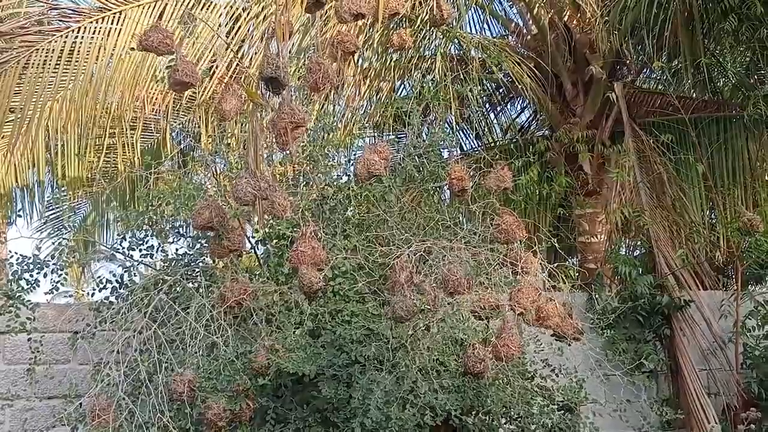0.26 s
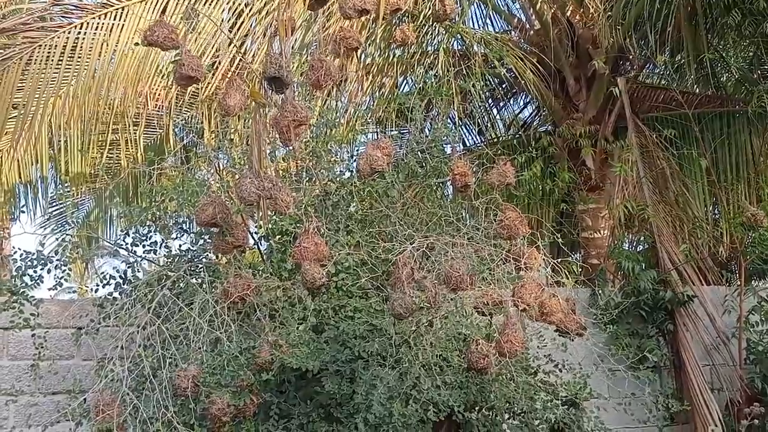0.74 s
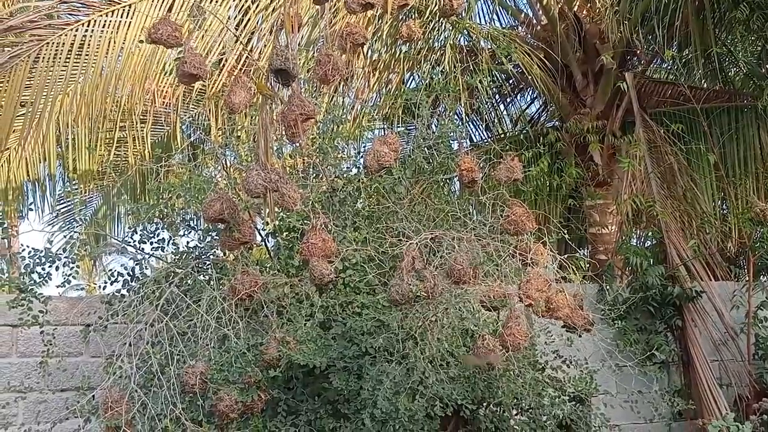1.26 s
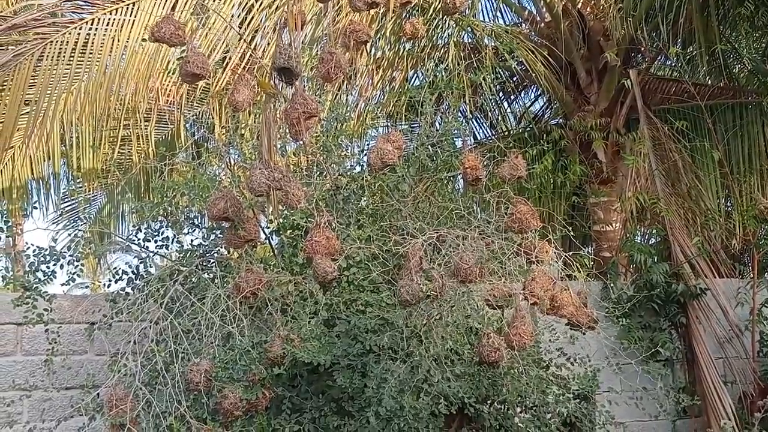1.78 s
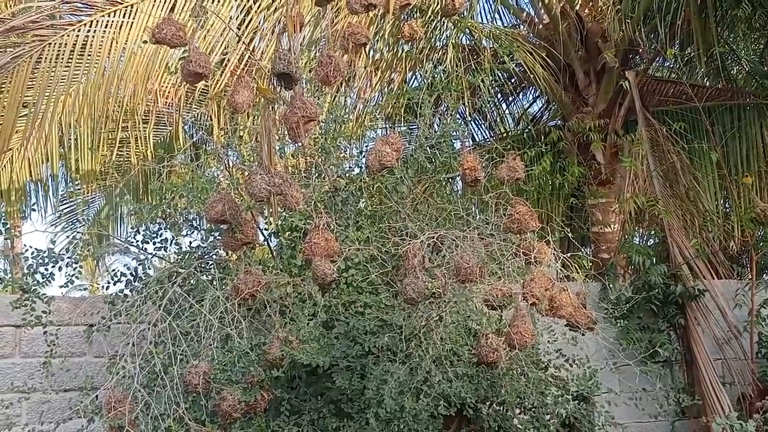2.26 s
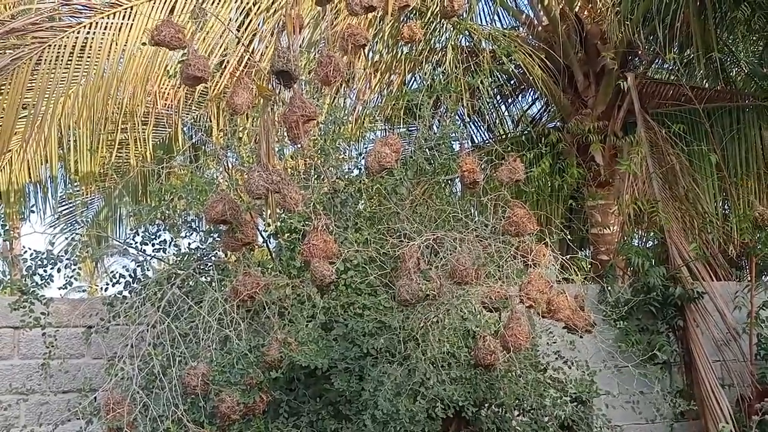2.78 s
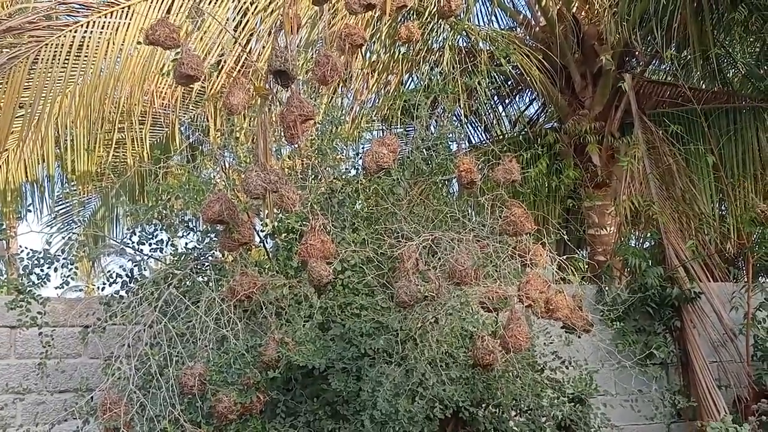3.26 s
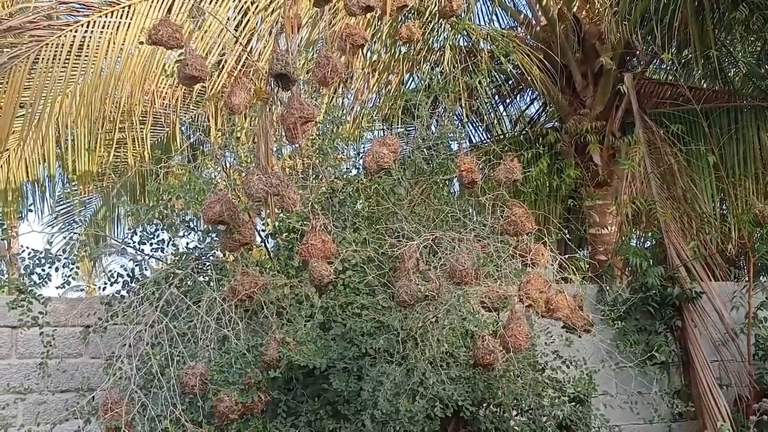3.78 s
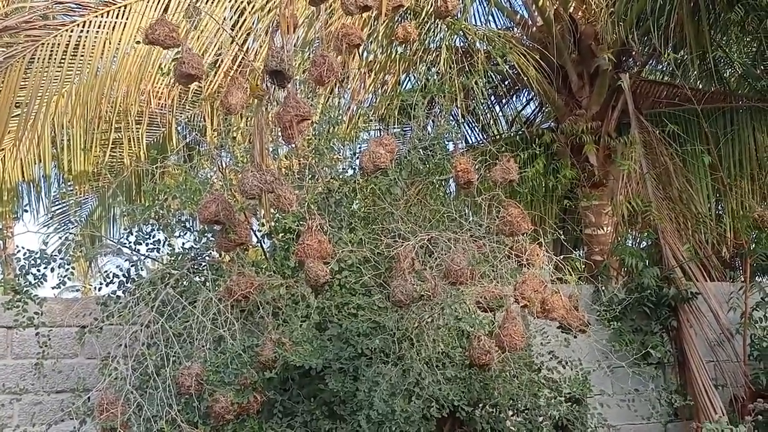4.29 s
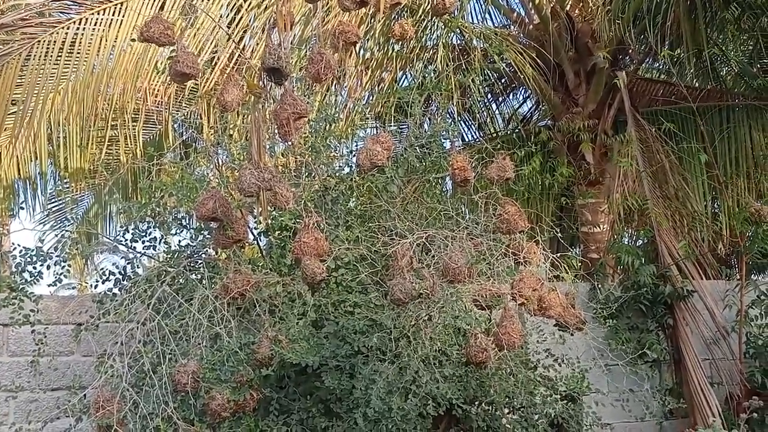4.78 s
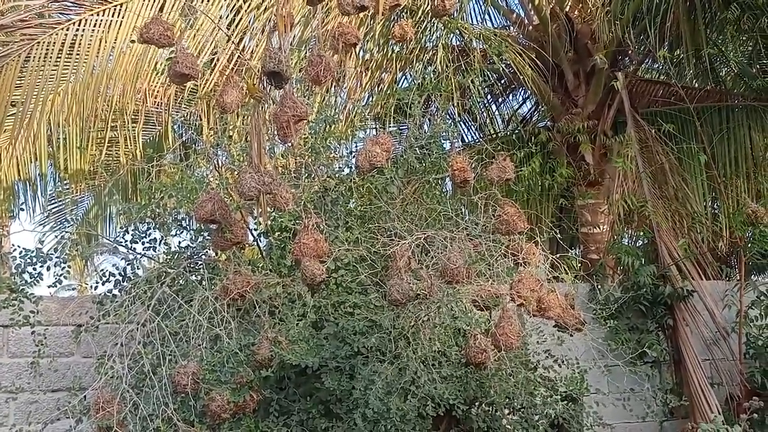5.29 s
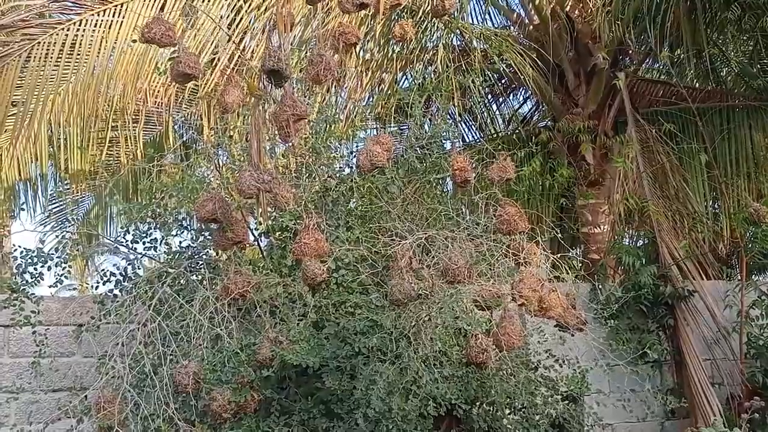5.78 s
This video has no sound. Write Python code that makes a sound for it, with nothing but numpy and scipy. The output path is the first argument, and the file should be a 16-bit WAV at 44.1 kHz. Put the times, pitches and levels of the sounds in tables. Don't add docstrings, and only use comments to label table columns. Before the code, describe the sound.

A weaver bird colony in a palm garden: soft buzzes and a dove's coo, a loud raspy chatter, dense chirping, then dry bill ticks and a sizzle.

```python
import sys
import numpy as np
from scipy import signal
from scipy.fft import rfft, irfft, next_fast_len
from scipy.io import wavfile
from scipy.ndimage import uniform_filter1d

SR = 44100
rng = np.random.default_rng(int(sys.argv[2]) if len(sys.argv) > 2 else 0)


def linear_from_db(decibels):
    return 10 ** (np.asarray(decibels, float) / 20)


def pcm_store(signal):
    levels = np.round(np.clip(np.atleast_2d(signal), -1, 1) * 32767)
    wavfile.write(sys.argv[1], SR, levels.astype(np.int16).T)


N = 266364


def unit(x):
    return x / np.sqrt(np.mean(x ** 2) + 1e-20)


def colour(x, points):
    size = next_fast_len(N + 4096)
    hz, level_db = np.transpose(points)
    bins_hz = np.arange(size // 2 + 1) * SR / size
    log_gain = np.interp(np.log(bins_hz + 1), np.log(hz), level_db) * np.log(10) / 20
    cepstrum = irfft(log_gain, size)
    cepstrum[1:size // 2] *= 2
    cepstrum[size // 2 + 1:] = 0
    return irfft(rfft(x, size) * np.exp(rfft(cepstrum)), size)[:N]


def wobble(size, hz):
    sos = signal.butter(2, hz, fs=SR, output="sos")
    return unit(signal.sosfilt(sos, rng.standard_normal(size + 2000))[2000:])


def shaken(phase, rough, real_hz, imag_hz):
    size = len(phase)
    shake = rough * (wobble(size, real_hz) + 1j * wobble(size, imag_hz))
    return np.real((1 + shake) * np.exp(1j * phase))


def grit(per_s, spread_db):
    sizes = linear_from_db(spread_db * np.minimum(rng.exponential(1, N), 4)) * rng.choice([-1, 1], N)
    sparse = sizes * (rng.random(N) < per_s / SR)
    return unit(unit(sparse) + 0.85 * rng.standard_normal(N))


def unroll(rows):
    s, pitch, *levels = np.transpose(rows)
    t = np.arange(round(s[0] * SR), min(N, round(s[-1] * SR))) / SR
    ends = np.clip(np.minimum(t - s[0], s[-1] - t) / 0.0013, 0, 1)
    phase = 2 * np.pi * np.cumsum(np.interp(t, s, pitch)) / SR
    gains = [linear_from_db(np.interp(t, s, column)) for column in levels]
    return round(s[0] * SR), np.sqrt(2) * ends, phase, gains


def add(out, start, x):
    out[start:start + len(x)] += x[:N - start]


def effort(start, length, level_db, shape):
    attack, rise_db, held, fall_db = shape
    top = min(attack, 0.5 * length)
    release = max(np.clip(held, 0, .95) * length, top + .001)
    s = start + np.array([0, top, release, length])
    return s, level_db - np.array([rise_db, 0, 0, fall_db])


def glides(table, shape, octave_db, bend=1):
    out = []
    for start, length, first_hz, last_hz, level_db in table:
        share = np.linspace(0, 1, 16)
        s = start + length * share
        db = np.interp(s, *effort(start, length, level_db, shape))
        moved = share ** bend if bend >= 1 else 1 - (1 - share) ** (1 / bend)
        out.append(np.column_stack([s, first_hz + (last_hz - first_hz) * moved, db, db + octave_db]))
    return out


# f/Hz, level/dB
AIR_SPECTRUM = [(20, -40), (40, -16), (80, 1), (110, 0.5), (160, -5), (400, -9.5), (550, -9), (850, -17.5),
                (1700, -17.5), (3000, -19.5), (8400, -20.5), (12000, -33.5), (15800, -27.5)]


def traffic_air(near):
    air = linear_from_db(-59 + 1.3 * wobble(N, 6.0)) * unit(colour(rng.standard_normal(N), AIR_SPECTRUM))
    loudness = uniform_filter1d(np.abs(near), size=6000, origin=2000)
    return air / (1 + loudness / 0.04)


# t/s, level/dB
FLOCK_LEVEL = [(0, -56), (.18, -67), (.5, -73), (.95, -67), (1.55, -46.5), (2.0, -54), (2.5, -49),
               (2.58, -85), (2.8, -47.5), (3.86, -49.5), (3.93, -51.5), (4.05, -54), (4.54, -50.5),
               (4.63, -53), (5.1, -58.5), (5.6, -57.5), (5.77, -62.5), (6.04, -52)]
# f/Hz, level/dB per Hz
CHORUS_SPECTRUM = [(1500, -57.5), (2300, -2), (2900, -4), (3700, 9.5), (5000, 11.5), (6300, 15),
                   (8000, -48), (12000, -13.5)]
# f/Hz, level/dB per Hz
WHEEZE_SPECTRUM = [(4000, -22), (6500, 1), (8300, 8.5), (10500, -8), (12500, -17), (14500, -16),
                   (15800, -34)]
# t/s, length/s, level/dB
WHEEZE_PHRASES = [(0.567, 1.7, -75), (1.183, 2.24, -59.5), (2.557, 0.38, -61), (2.867, 0.45, -45),
                  (3.193, 0.3, -51), (3.483, 0.44, -46), (3.93, 0.17, -53), (4.173, 0.35, -49),
                  (4.488, 0.65, -48.5), (5.033, 0.73, -51), (5.662, 0.63, -51.5)]


def flock():
    t = np.arange(N) / SR
    wheeze = np.full(N, linear_from_db(-85))
    for phrase in WHEEZE_PHRASES:
        s, db = effort(*phrase, (0.14, 25, 0.66, 8.4))
        wheeze += linear_from_db(np.interp(t, s, db, left=-120, right=-120))
    wheeze = uniform_filter1d(wheeze, size=1500)
    chorus_db = np.interp(t, *np.transpose(FLOCK_LEVEL)) + 2.5 * wobble(N, 14.0)
    low = unit(colour(grit(4000.0, 3.0), CHORUS_SPECTRUM)) * linear_from_db(chorus_db)
    high = unit(colour(grit(4000.0, 1.1), WHEEZE_SPECTRUM)) * wheeze * linear_from_db(1.8 * wobble(N, 17.0))
    return low + high


# t/s, f/Hz, level/dB
CROW_PITCH = [
    (1.98, 493, -75),
    (1.986, 493, -69),
    (2.088, 702, -56.5),
    (2.268, 758, -55.5),
    (2.29, 706, -57),
    (2.386, 738, -59.5),
    (2.542, 634, -62.5),
    (2.59, 501, -86),
]
# multiple, level/dB
CROW_HARMONICS = [(1, -0.5), (2, -5), (3, -7.5), (4, -6.5), (5, -4.5), (6, -2)]


def cock():
    out = np.zeros(N)
    start, ends, phase, (g,) = unroll(CROW_PITCH)
    phase = phase + 2 * np.pi * np.cumsum(9.0 * wobble(len(g), 25.0)) / SR
    for k, level_db in CROW_HARMONICS:
        hoarse = 1 + 0.18 * wobble(len(g), 40.0)
        add(out, start, ends * g * linear_from_db(level_db) * hoarse * np.sin(round(k) * phase))
    return out


# t/s, f/Hz, level/dB, length/s
CHIP_NOTES = [(0.088, 1610, -62, 0.023), (0.513, 2370, -69, 0.03), (0.595, 2320, -66, 0.024),
              (0.715, 2310, -69, 0.014), (0.797, 2320, -67.5, 0.039), (0.905, 2310, -66.5, 0.026),
              (1.085, 2200, -67, 0.039), (1.192, 2250, -67, 0.074), (1.236, 1633, -58.5, 0.034),
              (1.287, 2270, -65.5, 0.044), (2.957, 2630, -62.5, 0.077), (2.719, 995, -74, 0.26),
              (2.802, 1405, -69, 0.2), (3.519, 2690, -64, 0.12), (3.757, 1715, -68, 0.143),
              (.372, 3000, -56.5, 0.05), (4.349, 2420, -57, 0.063), (4.602, 1810, -63.5, .016),
              (4.906, 2660, -60.5, 0.07), (5.003, 2570, -67.5, 0.1), (5.148, 2600, -76, .04),
              (5.346, 2950, -68, 0.064), (5.49, 3200, -64, .03), (5.69, 1400, -71, 0.13),
              (5.796, 1660, -67, 0.045)]


def chips():
    out = np.zeros(N)
    for s, hz, level_db, length in CHIP_NOTES:
        rows = [(s, hz * 1.015, level_db), (s + length, hz / 1.015, level_db - 3)]
        start, ends, phase, (g,) = unroll(rows)
        add(out, start, ends * g * shaken(phase, .65, 160.0, 140.0))
    return out


# t/s, length/s, top f/Hz, last f/Hz, level/dB
COO_NOTES = [
    (0.224, 0.058, 567, 559, -44.5),
    (0.254, 0.12, 705, 578, -46.5),
    (0.324, 0.17, 536, 516, -51.5),
    (0.495, 0.22, 607, 587, -50.5),
    (0.842, 0.436, 599, 577, -54),
    (1.536, 0.13, 607, 549, -52.5),
]


def dove():
    out = np.zeros(N)
    for start_s, length, top_hz, last_hz, level_db in COO_NOTES:
        s, db = effort(start_s, length, level_db, (.04, 12.0, .55, 8.0))
        pitch = [.92 * top_hz, top_hz, top_hz + 0.81 * (last_hz - top_hz), last_hz]
        start, ends, phase, (g,) = unroll(np.column_stack([s, pitch, db]))
        add(out, start, ends * g * linear_from_db(1.2 * wobble(len(g), 12.0)) * np.sin(phase))
    return out


def garden(x):
    t60_s, echo_db = 0.14, -4.5
    t = np.arange(round(.3 * SR)) / SR
    tail = rng.standard_normal(len(t)) * linear_from_db(-60 * t / t60_s) * np.minimum(t / .006, 1)
    return linear_from_db(echo_db) * signal.fftconvolve(x, unit(tail) / np.sqrt(len(t)))[:N]


# delay t/s, gain
EARLY_REFLECTIONS = [(.0006, .4), (.0031, .3)]


def bounce(x):
    return x + sum(gain * np.r_[np.zeros(round(s * SR)), x][:N] for s, gain in EARLY_REFLECTIONS)


# f/Hz, level/dB
MICROPHONE_RESPONSE = [(500, -5), (11000, 4.5), (12600, -16), (15800, -1)]


def microphone(x):
    return colour(x, MICROPHONE_RESPONSE)


# f/Hz, level/dB per Hz
SNAP_SPECTRUM = [(800, -16.5), (1400, -22), (2600, -12), (3000, -16), (3700, -2.5), (4400, -5.5),
                 (5300, -2), (6400, 7), (8400, -5.5), (9400, 1), (10700, -8.5), (12300, -22), (15800, -39)]


def snaps(train):
    snap = colour(1.0 * (np.arange(N) == 0), SNAP_SPECTRUM)[:2000]
    return signal.fftconvolve(train, snap / np.max(np.abs(snap)))[:N]


def dying_noise(starts, spectrum):
    decay = signal.lfilter([1], [1, -np.exp(-1 / (.012 * SR))], starts + 1e-18)
    return decay * unit(colour(rng.standard_normal(N), spectrum))


def resonance(x, hz, t60_s):
    r, w = linear_from_db(-60 / (t60_s * SR)), 2 * np.pi * hz / SR
    return signal.lfilter([0, np.sin(w)], [1, -2 * r * np.cos(w), r * r], x + 1e-18)


# f/Hz, level/dB
THROAT_TONES = [(1400, -26.5), (2600, -15.5)]


def throat_knock(x):
    return sum(linear_from_db(level_db) * resonance(x, hz, 0.013) for hz, level_db in THROAT_TONES)


# f/Hz, level/dB per Hz
SCRAPE_SPECTRUM = [(800, -18), (1400, -10.5), (2500, -7), (3200, -10), (5000, -6), (6600, 0.5), (8400, 5),
                   (10500, -12), (12500, -27), (15800, -34)]
# t/s, peak level/dB, rasp level/dB
BILL_TICKS = [(4.0944, -41, -61), (4.7874, -42, -42.5), (4.8612, -48, -41.5), (4.934, -35, -43),
              (5.0104, -47, -43.5), (5.084, -36, -44), (5.1632, -44, -42.5), (5.234, -28, -51),
              (5.282, -26, -49), (5.3317, -26, -66), (5.38, -28.5, -50), (5.526, -36, -60)]


def bill_ticks():
    train, bell, scrape = np.zeros((3, N))
    for s, peak_db, rasp_db in BILL_TICKS:
        train[round(s * SR)] += linear_from_db(peak_db + 1.0)
        bell[round((s + .0015) * SR)] = linear_from_db(peak_db - 3.5)
        scrape[round(s * SR)] = linear_from_db(rasp_db)
    ringing = resonance(bell, 8400, 0.011) + throat_knock(.3 * bell)
    return snaps(train) + ringing + dying_noise(scrape, SCRAPE_SPECTRUM)


# first t/s, clicks, first gap/s, gap growth, peak level/dB
SIZZLE_TRAINS = [
    (5.4297, 7, .0121, 1.025, -32),
    (5.7915, 2, .006, 1, -34),
    (5.8026, 9, .00455, 1.03, -27),
    (5.8522, 3, .0093, 1.05, -31),
    (5.8812, 15, .01035, 1.0088, -27),
]


def sizzle():
    train, hiss, scrape, knock = np.zeros((4, N))
    for first, count, gap, growth, peak_db in SIZZLE_TRAINS:
        s = first + np.cumsum(np.r_[0, gap * growth ** np.arange(count - 1)])
        at = (s * SR).astype(int)
        train[at] = linear_from_db(peak_db + 1.0 + rng.normal(0, 1, count))
        if count > 10:
            train[((s - .0025) * SR).astype(int)] = linear_from_db(peak_db - 1 + rng.normal(0, 1, count))
        if gap > .012:
            knock[at] = linear_from_db(peak_db)
            scrape[at] = linear_from_db(peak_db - 20.5)
        hiss[at] = linear_from_db(peak_db - 23.0)
    friction = dying_noise(scrape, SCRAPE_SPECTRUM) + dying_noise(hiss, SNAP_SPECTRUM)
    return snaps(train) + throat_knock(knock) + friction


# f/Hz, level/dB per Hz
RASP_SPECTRUM = [(2500, -37.5), (3600, 5), (5500, 6), (8400, 5.5), (10800, 2.5), (12500, -13), (14800, -4),
                 (15800, -81)]


def rasp(voice, level_db):
    flow = uniform_filter1d(np.abs(voice), size=70)
    return linear_from_db(level_db) * flow * unit(colour(grit(6500.0, 2.3), RASP_SPECTRUM))


def pulsed_tones(table, depth, rough, lift_db, third_db):
    pulses_per_s, weak_pulse_db, swing_hz = 330.0, -4.5, 680.0
    out = np.zeros(N)
    for rows in table:
        start, ends, phase, (main, octave) = unroll(rows)
        beat = np.cumsum(pulses_per_s * linear_from_db(.7 * wobble(len(phase), 27.0))) / SR
        pulse = beat.astype(int)
        luck = rng.standard_normal((400, 2))[pulse % 400]
        size = linear_from_db(weak_pulse_db * (pulse % 2) + 1.5 * luck[:, 0])
        gate = 1 - depth + depth * unit(size * np.sin(np.pi * beat) ** 2)
        swoop = swing_hz / pulses_per_s * np.sin(np.pi * beat) + .35 * luck[:, 1]
        phase = phase + depth * swoop
        for k, g in enumerate([main, octave, linear_from_db(third_db) * main], 1):
            add(out, start, linear_from_db(lift_db) * ends * gate * g * shaken(k * phase, rough, 620.0, 970.0))
    return out


# t/s, length/s, first f/Hz, last f/Hz, level/dB
PLUNGES = [
    (.972, 0.033, 5810, 3390, -53.5),
    (1.347, 0.035, 5430, 4190, -52.5),
    (4.355, 0.038, 2875, 2730, -57),
]
# t/s, length/s, first f/Hz, last f/Hz, level/dB
DROPS = [
    (1.075, .034, 6000, 5030, -51),
    (1.081, 0.036, 4400, 4100, -56.5),
    (1.366, .022, 4600, 3650, -52),
    (2.586, .026, 4100, 3950, -58),
    (2.587, .022, 7400, 7250, -62),
    (2.588, .024, 6100, 5900, -56),
    (2.589, .014, 8100, 8000, -62),
    (4.552, 0.045, 6400, 5050, -59),
    (5.631, .059, 3100, 3060, -71),
]
# t/s, length/s, first f/Hz, last f/Hz, level/dB
QUICK_FLICKS = [(1.108, .006, 5000, 7600, -50), (1.783, .008, 7900, 6400, -60),
                (2.908, .014, 9600, 8400, -56), (3.35, .036, 9100, 5000, -59),
                (2.833, .02, 4950, 4600, -58), (2.882, .018, 5000, 4700, -57),
                (2.883, .02, 9900, 9300, -59), (2.91, .025, 4900, 4500, -59),
                (3.991, .005, 6400, 7800, -61), (4.09, .005, 5700, 6900, -51),
                (5.521, .008, 4800, 8060, -43), (5.545, .006, 5800, 7700, -47)]


def whistles():
    shape, octave_db = (0.03, 8, 1.4, 2.6), -13
    table = glides(PLUNGES, shape, octave_db, bend=2.5) + glides(DROPS, shape, octave_db, bend=.17)
    table += glides(QUICK_FLICKS, shape, octave_db)
    return pulsed_tones(table, depth=0.075, rough=0.34, lift_db=11.0, third_db=-27.0)


# t/s, f/Hz, level/dB, octave level/dB
SWELL_NOTES = [
    [(2.588, 5350, -50, -64), (2.612, 5230, -35.5, -55), (2.63, 5050, -31, -50), (2.655, 4830, -38.5, -54),
     (2.676, 4860, -54, -66)],
    [(2.92, 4200, -58, -64), (2.96, 4050, -55, -49), (3.0, 4050, -53, -52), (3.05, 4010, -49, -66),
     (3.12, 4180, -50, -69)],
    [(3.03, 4860, -55, -74), (3.12, 4930, -41.5, -52), (3.16, 5065, -37, -49), (3.21, 5136, -42, -51),
     (3.27, 4950, -59, -53)],
]


def swells():
    throb = 1 + .45 * np.sin(2 * np.pi * np.cumsum(78.0 * linear_from_db(wobble(N, 15.0))) / SR)
    return throb * pulsed_tones(SWELL_NOTES, depth=.45, rough=.3, lift_db=0, third_db=-22.0)


# t/s, length/s, low f/Hz, first swing f/Hz, turns per s, level/dB
WARBLE_NOTES = [
    (.424, .042, 4750, 250, 33, -47),
    (1.531, .036, 5200, 2100, 84, -39),
    (4.2625, .062, 4950, 2600, 113, -41),
    (5.564, .018, 4700, 1300, 55, -41),
    (5.654, .018, 4500, 1800, 55, -50),
]


def warbles():
    out = np.zeros(N)
    for start, length, low_hz, swing_hz, rate, level_db in WARBLE_NOTES:
        t = np.linspace(0, length, 200)
        swing = swing_hz * .58 ** (t / length)
        pitch = low_hz + swing * np.sin(np.pi * rate * t) ** 2
        db = np.interp(start + t, *effort(start, length, level_db, (0.0069, 3.8, 0.2, 3.5)))
        first, ends, phase, (g,) = unroll(np.column_stack([start + t, pitch, db]))
        throb = 1 + .8 * np.sin(4 * np.pi * rate * np.arange(len(g)) / SR)
        shake = .35 * (wobble(len(g), 500.0) + 1j * wobble(len(g), 810.0))
        tone = np.exp(1j * phase) + linear_from_db(-18.0) * np.exp(2j * phase)
        add(out, first, ends * g * throb * np.real((1 + shake) * tone))
    return out


# t/s, length/s, first f/Hz, last
# f/Hz, level/dB
THIN_BUZZES = [(.322, 0.047, 5370, 5730, -49), (.415, 0.03, 5000, 4800, -59),
               (.755, 0.076, 5450, 5150, -66), (.756, .04, 9000, 8800, -72), (.988, .03, 5100, 4800, -56),
               (1.108, 0.035, 5600, 5500, -44), (1.109, .048, 6450, 6050, -44),
               (1.11, .02, 8000, 7600, -56), (1.23, 0.038, 5680, 5900, -54), (1.365, 0.03, 5550, 5660, -45),
               (2.73, 0.042, 5340, 5050, -46), (2.96, .052, 8500, 8400, -50), (3.03, .11, 7700, 8800, -53),
               (3.04, .1, 8700, 9800, -51), (3.28, 0.075, 4770, 4780, -51.5),
               (3.281, 0.071, 3755, 3800, -58.5), (3.36, .03, 8200, 8200, -57),
               (3.385, 0.073, 5400, 5500, -45.5), (3.43, 0.085, 5980, 6260, -42.5),
               (3.45, 0.16, 7060, 6990, -50.5), (3.525, 0.11, 8430, 8550, -53),
               (3.643, .095, 7050, 6850, -42.5), (3.775, 0.115, 6420, 6070, -45),
               (4.006, 0.059, 4230, 3890, -46.5), (4.1, 0.064, 3770, 3660, -49),
               (4.164, .032, 6250, 6050, -53), (4.258, .066, 5150, 5350, -49),
               (4.188, 0.078, 5900, 6310, -43.5), (4.305, 0.06, 5800, 6340, -45.5),
               (4.484, 0.045, 5500, 5600, -46.5), (4.57, 0.04, 5500, 5350, -55),
               (4.82, .06, 8000, 8200, -60), (4.995, .06, 10100, 10000, -63),
               (5.524, 0.05, 6500, 6600, -48.5), (5.525, .035, 7600, 7400, -53),
               (0, 0.025, 5700, 5400, -67), (0, .05, 3900, 3520, -66), (0.037, 0.059, 4200, 4460, -63),
                    (0.064, 0.044, 5800, 5500, -66), (0.083, .04, 4000, 3940, -63.5),
                    (.1, 0.035, 4700, 4970, -66), (0.194, 0.023, 8500, 8450, -70.5),
                    (0.32, 0.046, 3950, 3835, -53), (.41, 0.071, 3900, 3650, -59.5),
                    (0.417, .042, 6600, 6400, -63.5), (.582, 0.031, 6600, 6450, -68),
                    (.583, 0.03, 8500, 8460, -65), (2.677, .024, 8300, 8270, -51.5),
                    (2.881, 0.066, 8500, 8400, -55.5), (3.567, 0.0423, 4000, 3810, -49),
                    (3.59, 0.076, 7000, 7100, -49), (3.664, 0.081, 6300, 6210, -49),
                    (3.721, 0.07, 7020, 6900, -45.5), (3.99, 0.088, 7000, 7600, -61.5),
                    (4.096, .013, 6700, 6560, -52), (4.485, 0.041, 3850, 3750, -55)]
# t/s, length/s, first f/Hz, last f/Hz, level/dB
RICH_BUZZES = [
    (.77, .045, 3700, 3600, -68),
    (.991, 0.025, 3900, 3500, -52),
    (3.621, 0.28, 5170, 5125, -51.5),
    (3.955, 0.04, 5600, 5990, -50.5),
    (4.106, 0.055, 4850, 5030, -46),
    (4.921, .149, 5000, 5030, -62),
    (5.575, 0.025, 5400, 5200, -54),
]


def buzzes():
    shape = (0.039, 2.7, 0.75, 13.3)
    table = glides(THIN_BUZZES, shape, octave_db=-30.0)
    table += glides(RICH_BUZZES, shape, octave_db=-13.0)
    pulsed = pulsed_tones(table, depth=.87, rough=.22, lift_db=8.0, third_db=-18.0)
    bill = signal.butter(8, 3150.0, "high", fs=SR, output="sos")
    return signal.sosfilt(bill, pulsed + swells() + warbles())


# f/Hz, level/dB
THROAT_RESPONSE = [(2300, -56), (2800, -16), (3600, -5), (4200, 2.5), (4800, -6), (5400, -12), (6200, -3),
                   (7000, -14), (8400, -11.5)]


def voiced(s, pitch, level_db, bright_db):
    hz, db = np.transpose(THROAT_RESPONSE)
    heard = []
    for k in (2, 3, 4, 6):
        passed_db = np.interp(np.log(k * pitch), np.log(hz), db)
        heard.append(level_db + passed_db + bright_db * np.log2(max(k, 3) / 3))
    return np.column_stack([s, pitch, *heard])


# t/s, length/s, first f/Hz, level/dB, brightness/dB per octave
HOOK_NOTES = [
    (0.277, 0.098, 2058, -43.5, -6),
    (3.525, 0.085, 2086, -42, 3),
    (4.437, 0.095, 1950, -42, -11),
]


def hooks():
    drop_s, knee_hz, sag_hz_per_s = 0.0165, 1500.0, 3000.0
    out = []
    for start, length, hz, level_db, bright_db in HOOK_NOTES:
        t = np.linspace(0, length, 60)
        pitch = knee_hz - sag_hz_per_s * t + (hz - knee_hz) * np.exp(-(t / drop_s) ** 2.2)
        haste = np.abs(np.gradient(pitch, t)) * drop_s / (hz - knee_hz)
        clear = uniform_filter1d(1. * (t > .024) * (t < .046), size=3)
        db = np.interp(start + t, *effort(start, length, level_db, (0.0056, 11, 1.8, 2.8)))
        db = db - 1.0 * haste + 5.0 * clear
        hoarse_db = 8.0 + (-9.0 - 8.0) * clear
        rows = voiced(start + t, pitch, db, bright_db - 12.0 * (t < .024))
        out.append(np.column_stack([rows, hoarse_db]))
    return out


# t/s, length/s, first f/Hz, level/dB, brightness/dB per octave
SLIDE_NOTES = [
    (3.912, 0.06, 1685, -54, -11),
]


def slides():
    out = []
    for start, length, hz, level_db, bright_db in SLIDE_NOTES:
        t = np.linspace(0, length, 60)
        db = np.interp(start + t, *effort(start, length, level_db, (0.014, 12, 0.68, 0.76)))
        rows = voiced(start + t, hz * .75 ** ((t / length) ** 0.88), db, bright_db)
        out.append(np.column_stack([rows, 20 * np.log10(np.linspace(.5, 2.0, len(t)))]))
    return out


# t/s, f/Hz, level/dB
TUNE_NOTES = [
    [(.383, 1474, -49), (.398, 1357, -44), (.424, 1222, -47), (.443, 1170, -50)],
    [(.702, 1950, -62), (.712, 1800, -61), (.722, 1500, -59), (.733, 1350, -56), (.75, 1300, -57),
     (.77, 1250, -61), (.8, 1200, -57)],
    [(1.152, 1780, -46), (1.172, 1680, -36.5), (1.196, 1550, -41), (1.206, 1577, -39), (1.216, 1485, -32.5),
     (1.232, 1380, -41), (1.245, 1356, -33.5), (1.267, 1295, -45.5)],
    [(1.39, 1288, -49), (1.419, 1395, -40.5), (1.455, 1415, -40.5), (1.491, 1333, -42.5),
     (1.519, 1225, -48)],
    [(2.713, 1480, -41), (2.725, 1340, -40), (2.738, 1240, -40), (2.762, 1215, -48)],
    [(3.263, 1680, -52), (3.275, 1530, -54.5), (3.297, 1430, -45)],
]
# level/dB of partials 2, 3, 4 and 6, hoarseness/dB
TUNE_PARTIALS = [(-16, 0, -14, -14, 2), (-9, 0, -12, -14, 4), (-18, 0, -13, -9, -3), (-11.0, 1, 2, -2.5, 0),
                 (-20, 0, -10, -20, 3), (-3, 0, -16, -16, 0)]


def tunes():
    out = []
    for tune, (*partials_db, hoarse_db) in zip(TUNE_NOTES, TUNE_PARTIALS):
        out.append([(s, hz, *(db + np.array(partials_db)), hoarse_db) for s, hz, db in tune])
    return out


def chirps():
    side, edge = linear_from_db(-8.0), linear_from_db(-14.0)
    out = np.zeros(N)
    for rows in hooks() + slides() + tunes():
        start, ends, phase, (g2, g3, g4, g6, hoarse) = unroll(rows)
        g1 = edge * np.minimum(g2, g2[len(g2) // 2])
        g5 = side * np.sqrt(g4 * g6)
        g7 = side ** 2 * g6
        for k, g in enumerate([g1, g2, g3, g4, g5, g6, g7, g7], 1):
            add(out, start, ends * g * shaken(k * phase, .32 * hoarse * np.sqrt(k / 4), 270.0, 230.0))
    return out


# t/s, peak level/dB
CHATTER_SYLLABLES = [(0.196, -46.5), (0.591, -44), (1.566, -27), (1.6267, -28), (1.683, -26),
                     (1.743, -25.5), (1.801, -25.5), (1.86, -24.5), (1.92, -26), (1.9805, -24),
                     (2.0367, -23.5), (2.097, -24.5), (2.156, -25), (2.218, -24.5), (2.2777, -24),
                     (2.343, -25.5), (2.406, -27), (2.4715, -26), (2.5294, -25.5), (2.684, -26),
                     (2.837, -34), (2.886, -31.5)]
# f/Hz, level/dB per Hz
CHATTER_SPECTRUM = [(470, -85), (800, -9), (1800, -19.5), (2010, -18), (2340, -10), (3360, -12), (3900, -1),
                    (4210, 5), (5200, 6.5), (7660, 0.5), (9120, -8.5), (10300, -11.5), (12800, -12.5),
                    (15800, -26)]


def chatter():
    rise_s, fall_s, repeat_s = 0.013, 0.0032, 0.0057
    t = np.arange(round(.06 * SR)) / SR
    spike = np.minimum(t / rise_s, 1) ** 2.2 * np.exp(-np.maximum(t - rise_s, 0) / fall_s)
    shape = spike + .19 * np.interp(t - repeat_s, t, spike, left=0)
    lead = np.sin(np.pi * np.minimum(t / 0.018, 1))
    env, voice = np.zeros((2, N))
    for s, peak_db in CHATTER_SYLLABLES:
        add(env, round((s - .006) * SR), linear_from_db(peak_db - 6.0) * shape)
        add(voice, round((s - .0096) * SR), linear_from_db(peak_db - 14.5) * lead)
    phase = 2 * np.pi * np.cumsum(2001.0 * linear_from_db(.25 * wobble(N, 30.0))) / SR
    stack = sum(shaken(k * phase, .5, 120.0, 120.0) for k in range(1, 6))
    harsh = .3 * unit(stack) + grit(3000.0, 3.5)
    nasal = unit(colour(stack, CHATTER_SPECTRUM))
    return voice * nasal + env * unit(colour(harsh, CHATTER_SPECTRUM))


def scene():
    nasal, buzzing = chirps(), buzzes()
    tuneful = microphone(nasal + whistles())
    harsh = rasp(nasal, level_db=-14.0) + rasp(buzzing, level_db=-9.5)
    harsh += bill_ticks() + sizzle() + chatter()
    near = tuneful + microphone(buzzing) + bounce(harsh)
    echo = garden(near - .5 * tuneful)
    far = dove() + cock() + chips() + bounce(flock())
    mono = near + echo + far + traffic_air(near)
    return np.array([mono, mono])


def top_cut(x):
    return signal.sosfilt(signal.butter(12, 16460, fs=SR, output="sos"), x)


def record(dry):
    steep = signal.cheby2(20, 60, 15750 + 300, fs=SR, output="sos")
    finished = signal.sosfilt(steep, dry)
    return top_cut(finished)


dry = scene()
out = record(dry)
pcm_store(out)
```